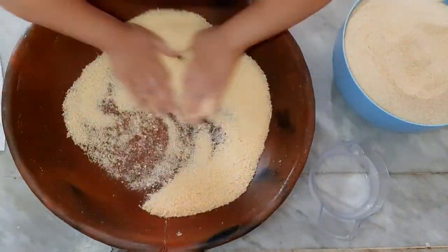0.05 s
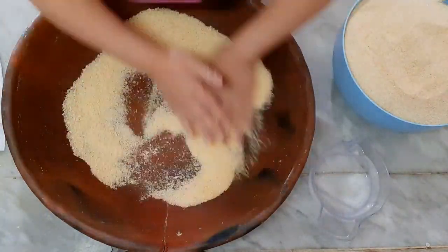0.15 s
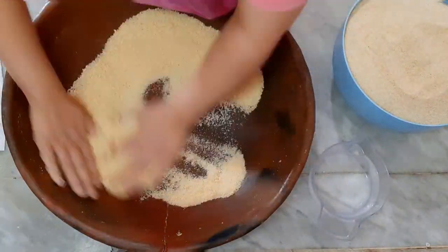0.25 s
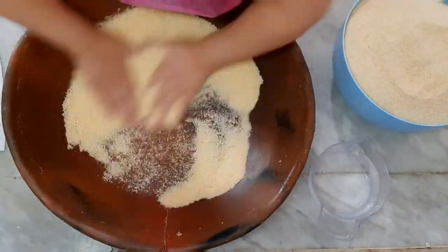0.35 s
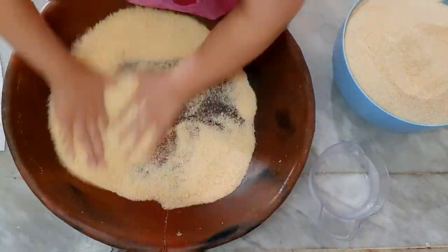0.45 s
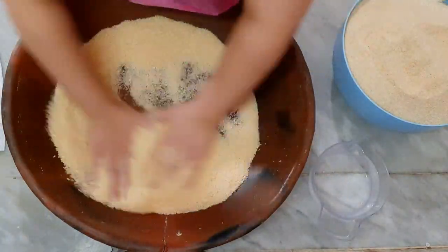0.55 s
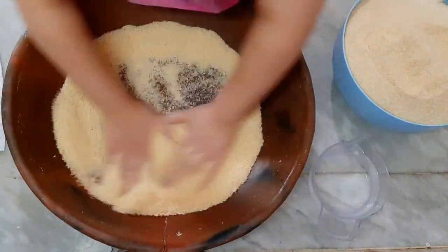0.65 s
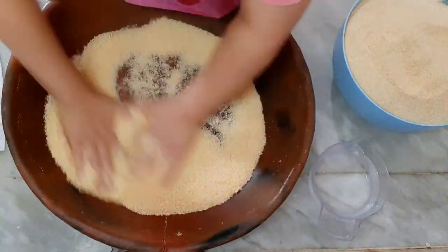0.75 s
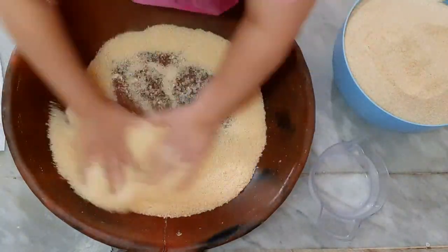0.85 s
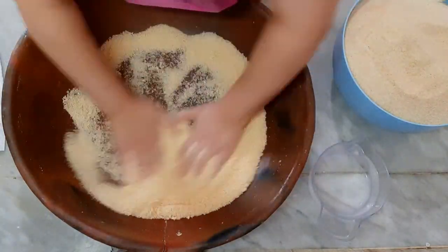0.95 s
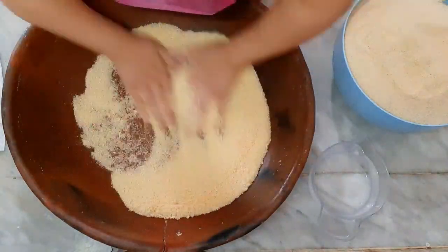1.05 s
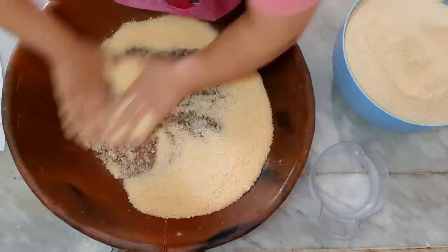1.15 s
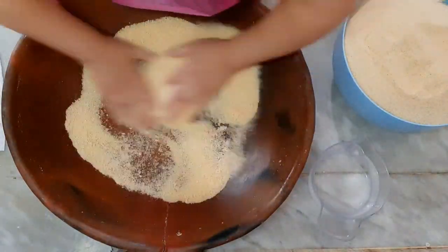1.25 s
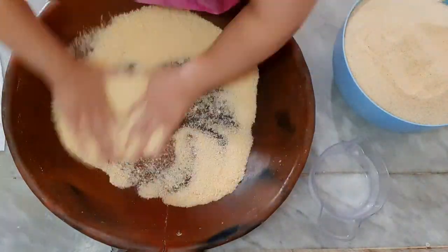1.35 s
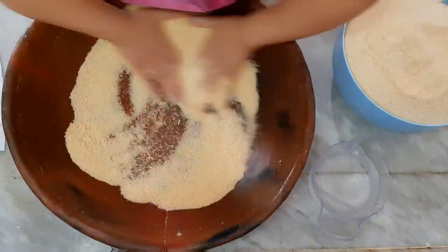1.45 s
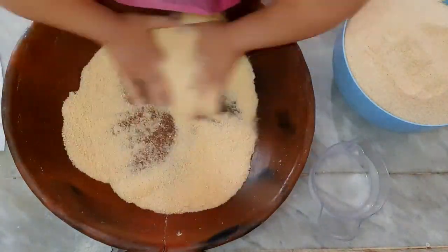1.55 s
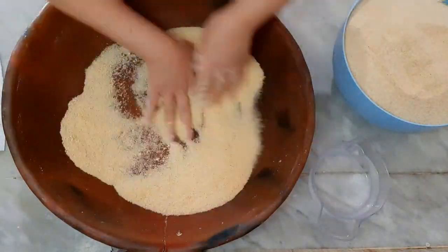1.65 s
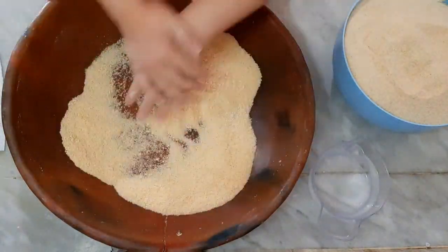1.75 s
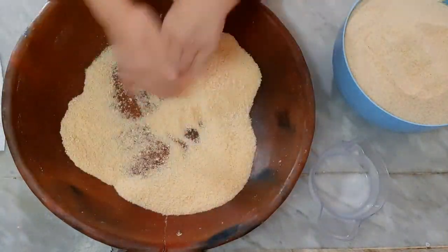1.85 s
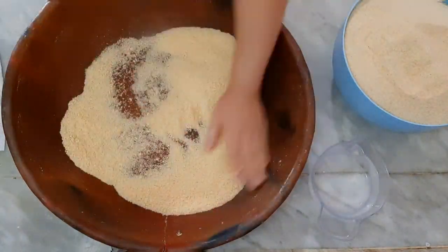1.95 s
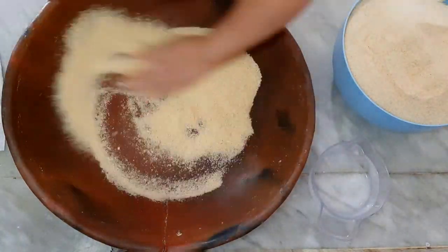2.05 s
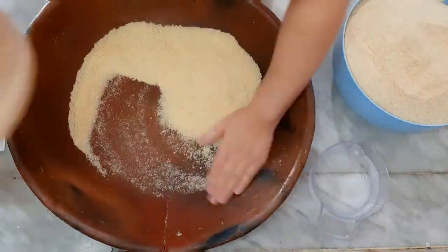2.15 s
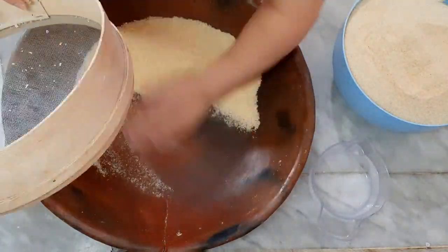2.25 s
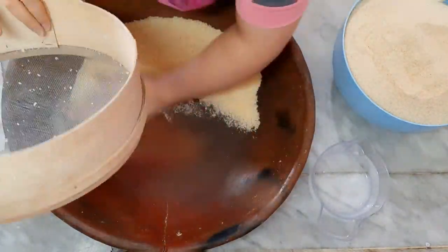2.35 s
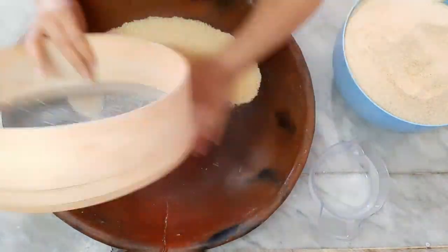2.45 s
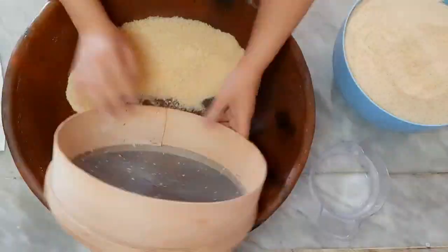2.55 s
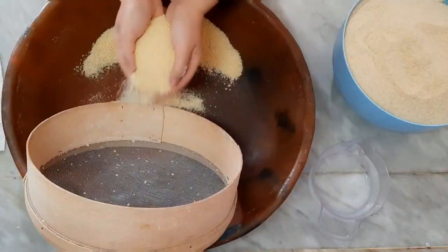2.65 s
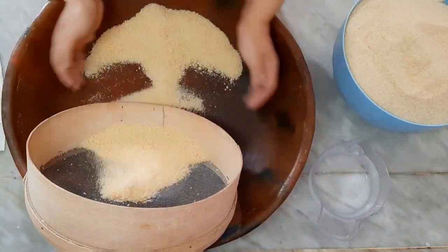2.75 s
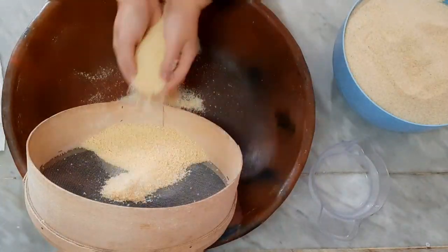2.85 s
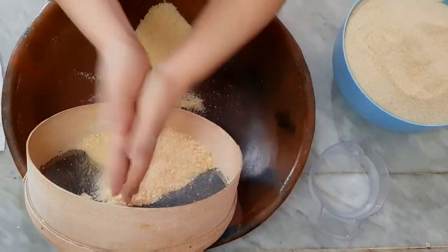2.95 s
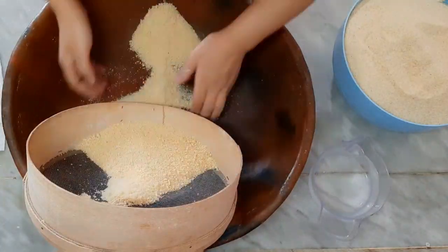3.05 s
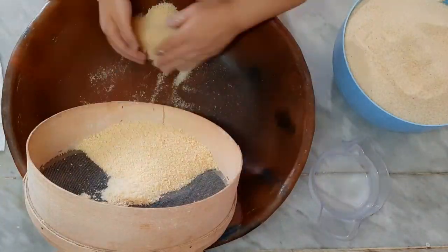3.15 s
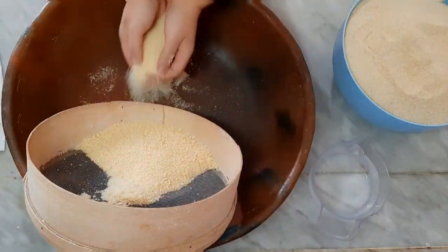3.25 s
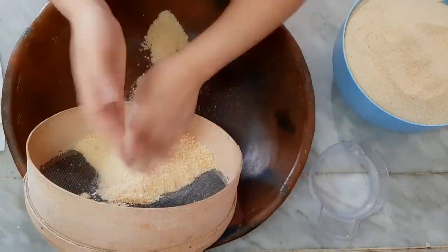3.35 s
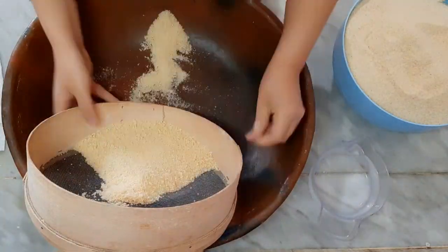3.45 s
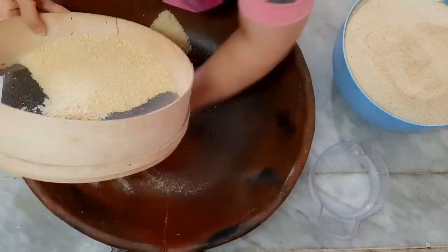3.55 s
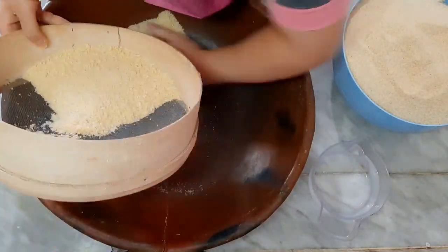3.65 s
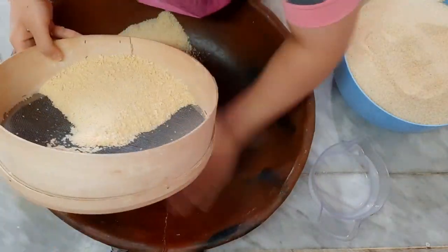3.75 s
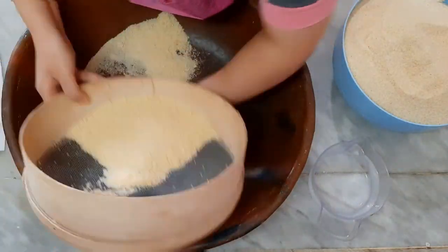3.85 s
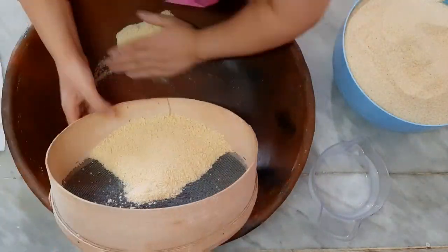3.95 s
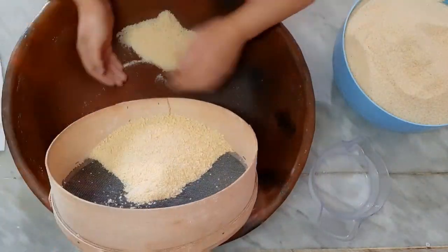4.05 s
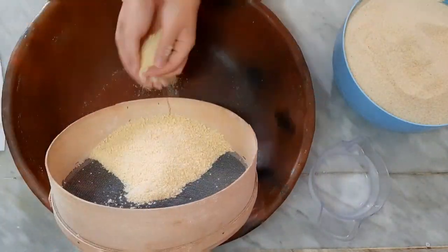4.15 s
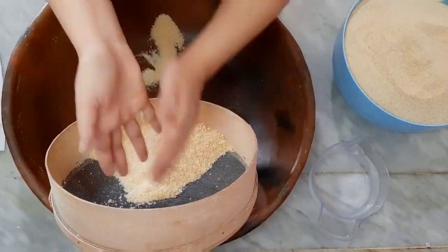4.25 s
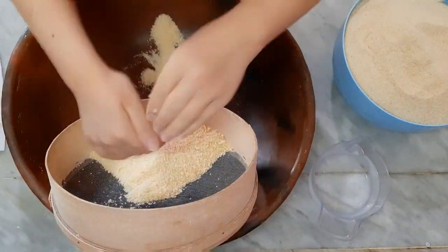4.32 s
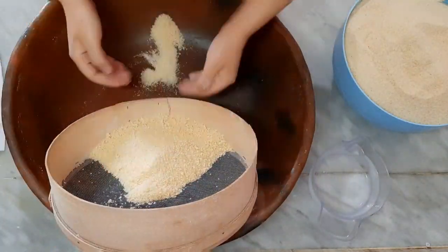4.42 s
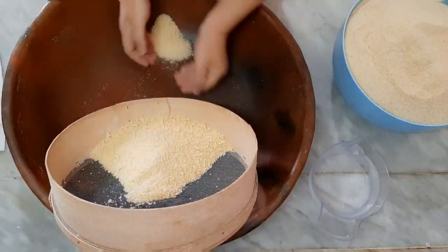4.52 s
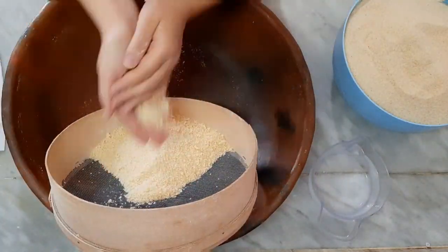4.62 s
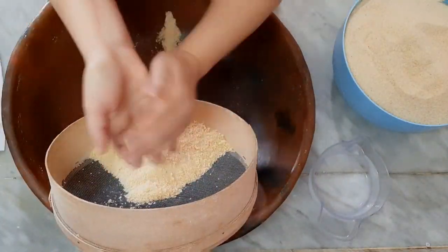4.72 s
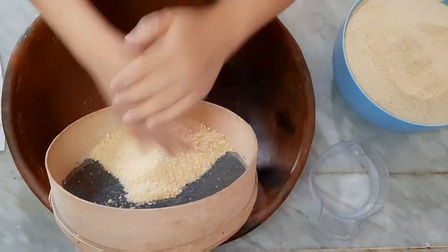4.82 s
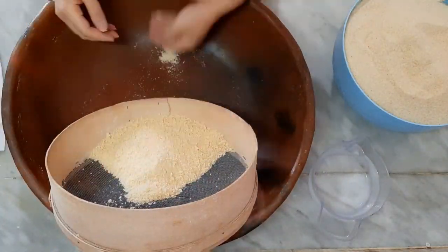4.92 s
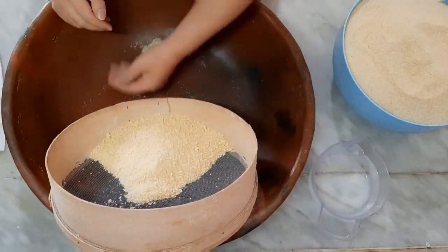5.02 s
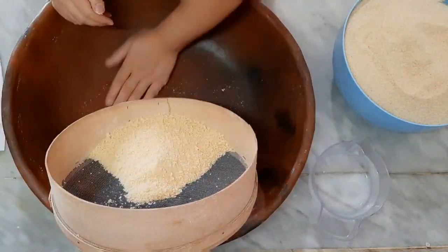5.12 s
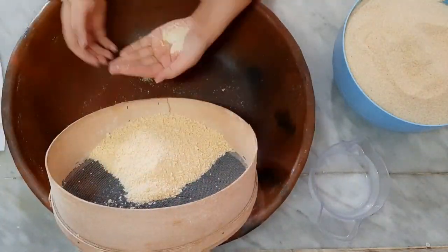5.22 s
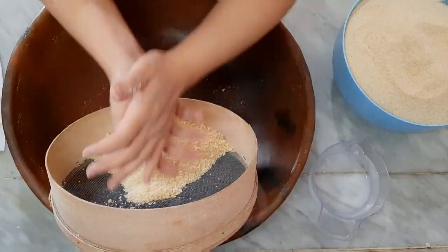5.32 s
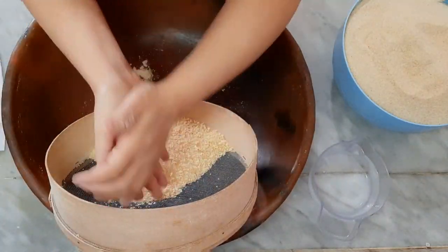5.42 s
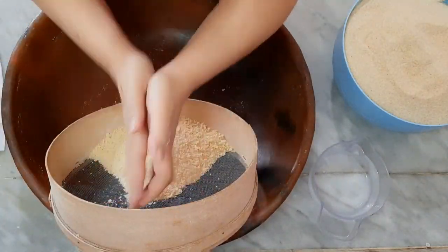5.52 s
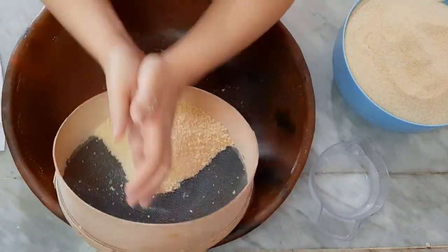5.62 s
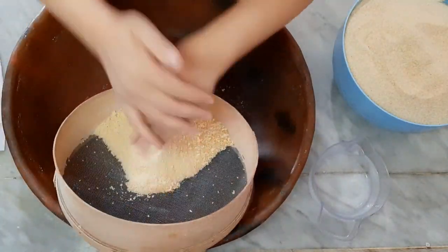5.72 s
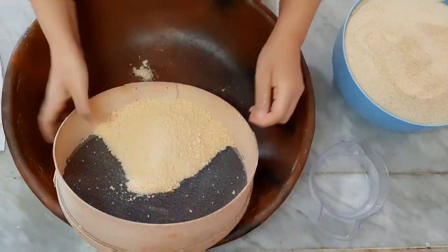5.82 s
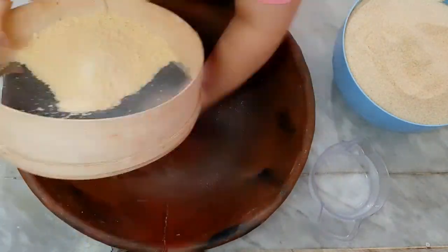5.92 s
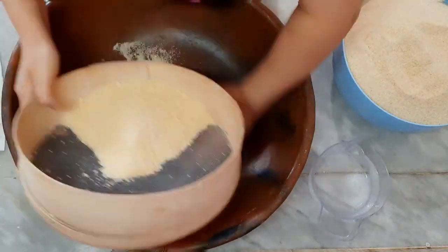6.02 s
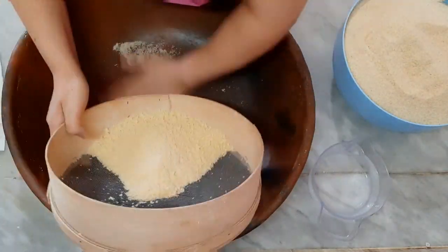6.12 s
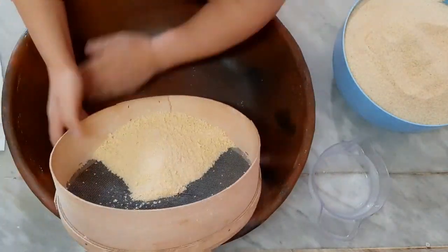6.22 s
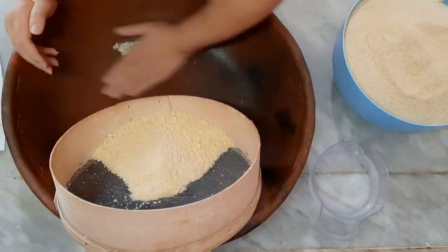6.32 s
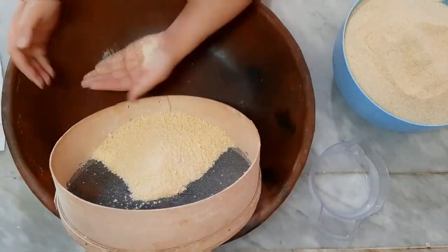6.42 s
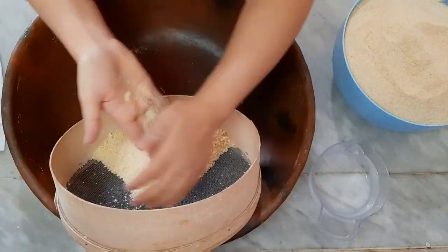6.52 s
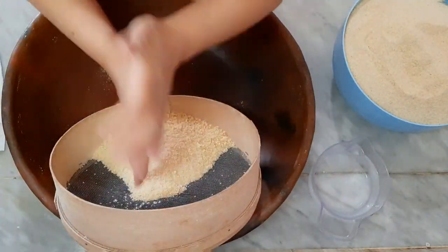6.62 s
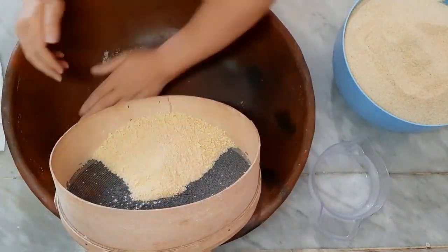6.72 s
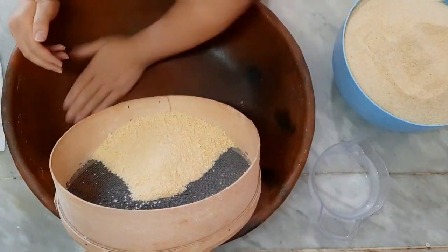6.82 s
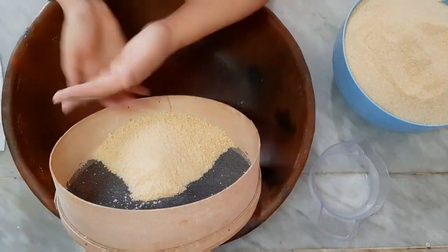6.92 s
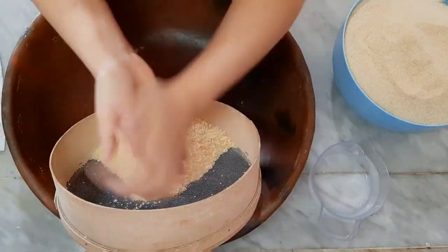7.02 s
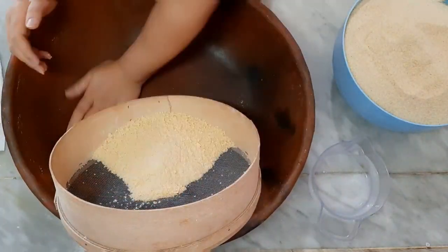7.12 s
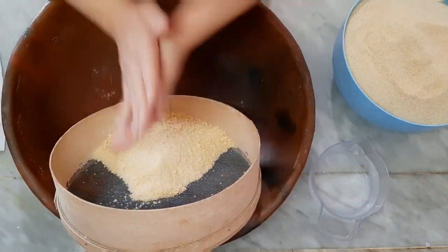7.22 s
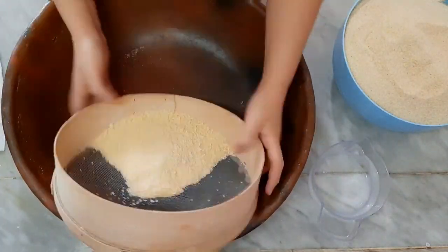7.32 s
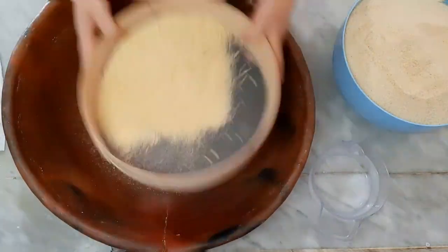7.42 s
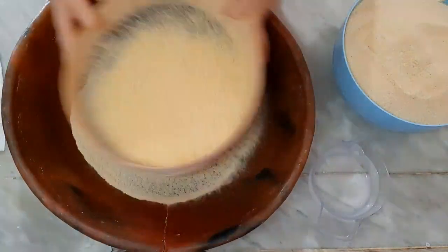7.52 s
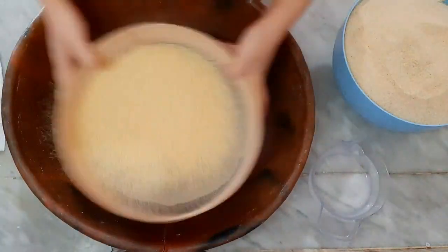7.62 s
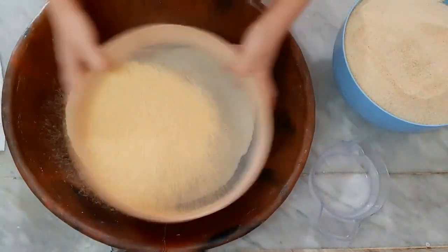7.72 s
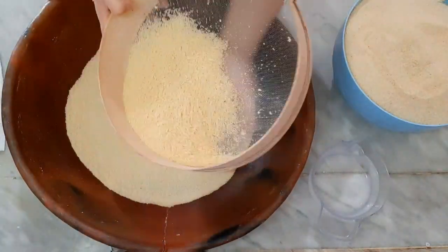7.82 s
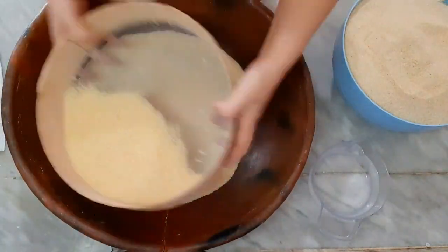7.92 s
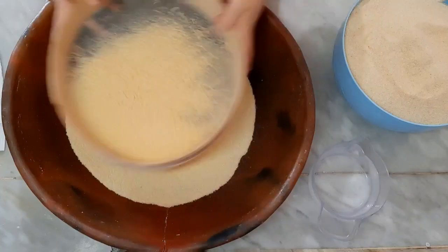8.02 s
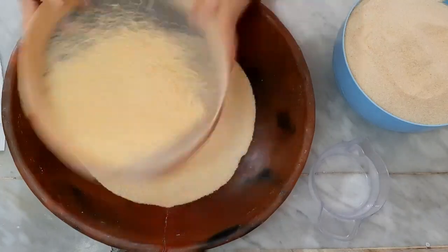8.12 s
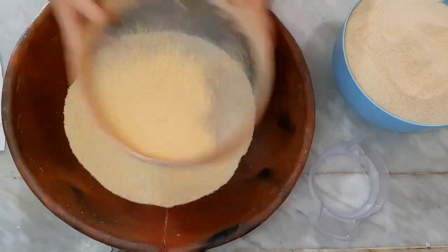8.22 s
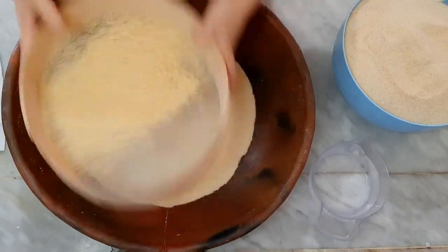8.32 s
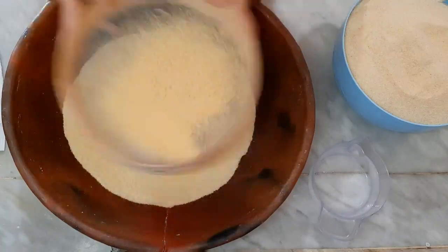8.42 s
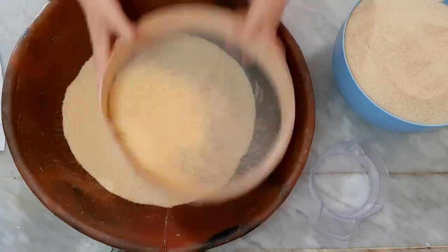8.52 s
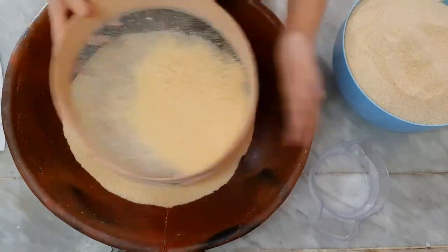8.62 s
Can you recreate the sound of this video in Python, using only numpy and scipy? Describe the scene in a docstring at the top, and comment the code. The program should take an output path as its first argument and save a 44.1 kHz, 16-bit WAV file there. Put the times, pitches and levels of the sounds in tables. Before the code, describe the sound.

Sped-up, chopped kitchen handling: gritty grain swishes, hollow bowl taps, a sharp clap, wooden thuds, finally a fast run of sifting hisses.

```python
"""A kitchen hums while hands sweep and scoop semolina in a wide clay bowl, sounding sped-up and chopped.
Shaped noise makes the sliding grain and the short bursts of hiss; bowl and sieve knock as notes and ringing noise.
Early on a bit of metal clinks as a few tones; then hands clap now and then, as noise cracks with short tails.
Near the end a wooden sieve is shaken in a quick run of hisses, and two last bursts follow.
Two unlike microphone ports listen throughout."""
import sys
import numpy as np
from scipy import signal
from scipy.fft import rfft, irfft, next_fast_len
from scipy.io import wavfile
from scipy.ndimage import uniform_filter1d, map_coordinates

SR = 44100
rng = np.random.default_rng(int(sys.argv[2]) if len(sys.argv) > 2 else 0)


def linear_from_db(decibels):
    """Turn decibels (scalar or array-like) into linear amplitude factors; 0 gives 1."""
    return 10 ** (np.asarray(decibels, float) / 20)


def bounce(signal):
    """Save signal as a 16-bit WAV file at the path given by the first command-line argument."""
    frames = np.transpose(np.atleast_2d(signal))
    limited = np.clip(frames, -1, 1)
    pcm = np.round(limited * 32767).astype(np.int16)
    wavfile.write(sys.argv[1], SR, pcm)


N = 382347  # length in samples

HARD_S = 0.021  # bursts shorter than this start more abruptly
# share of a burst's length that comes before its peak (less for the shortest bursts)
STROKE_RISE, KNOCK_RISE, TAP_RISE, NOTE_RISE = 0.44, 0.36, 0.25, 0.3
SIEVE_UP_S = 7.42  # the sieve is lifted off the bowl


def unit(x):
    """Scaled to rms 1."""
    return x / np.sqrt(np.mean(x ** 2) + 1e-20)


def along(points, hz):
    """Each column after Hz, read on a log frequency axis."""
    f, *cols = np.transpose(points)
    return np.squeeze([np.interp(np.log(hz + 1), np.log(f + 1), c) for c in cols])


def filtered(x, response):
    """The sound x with each frequency multiplied by the response."""
    m = next_fast_len(x.shape[-1] + 8192)
    gain = response(np.fft.rfftfreq(m, 1 / SR))
    return irfft(rfft(x, m) * gain, m)[..., :x.shape[-1]]


def spectrum(points):
    """Gain that follows a table of Hz and dB."""
    return lambda hz: linear_from_db(along(points, hz))


def resonant(modes):
    """Gain of resonances with steep skirts, added as powers."""
    def gain(f):
        power = 0
        for centre, width, db in modes:
            skirt = (f * width) ** 2
            power = power + (linear_from_db(db) * skirt / ((centre * centre - f * f) ** 2 + skirt)) ** 2
        return np.sqrt(power)
    return gain


# How alike left and right are. Each row: frequency in Hz, likeness (0 unrelated, 1 identical).
LIKENESS = [(60, 0.97), (250, 0.83), (500, 0.76), (900, 0.14), (2000, 0.063), (6100, 0.032), (6500, 0.77),
            (7400, 0.51), (7800, .05), (12800, .1), (13900, 0.73)]


def pair(excite, colour, uneven=None):
    """Blends two unrelated sounds into a coloured stereo pair of rms 1; a small uneven steadies its strength."""
    def turn(hz):
        return np.arccos(np.clip(along(LIKENESS, hz), 0, 1)) / 2
    mid, side = filtered(excite, lambda hz: colour(hz) * [np.cos(turn(hz)), np.sin(turn(hz))])
    if uneven:
        # only the shared part is steadied, by dividing by its own envelope
        envelope = np.abs(signal.hilbert(unit(mid), next_fast_len(N))[:N])
        mid = unit(unit(mid) / (uneven + envelope)) * np.std(mid)
    return unit(np.array([mid + side, mid - side]))


def noise():
    """Two unrelated channels of white noise."""
    return rng.standard_normal((2, N))


def grains(spread_db, patchy_db):
    """Dense grain impacts: sizes jump about every half millisecond, and the colour varies in patches."""
    size = np.repeat(rng.standard_normal(N // 20 + 1), 20)[:N]
    z = signal.stft(noise() * linear_from_db(spread_db * size), nperseg=512)[2]
    patches = uniform_filter1d(rng.standard_normal(z.shape[1:]), size=4, axis=0)  # over frequency
    patches = uniform_filter1d(patches, size=6, axis=1)  # over time
    return signal.istft(z * linear_from_db(patchy_db * unit(patches)), nperseg=512)[1][:, :N]


def swell(s, length, rise_share, edge):
    """Start sample and shape of a burst, its peak 1/8 s in; length is its width at half height."""
    t = np.arange(-SR // 8, SR // 8) / SR
    rise = np.clip(rise_share * min(1, length / HARD_S), 0.05, 0.95)
    u = np.where(t < 0, -t / rise, t / (1 - rise)) / max(length, 0.002)
    return round(s * SR), 2.0 ** -(u ** edge)


def bursts(rows, db, rise_share, edge):
    """Power over time of bursts (peak s, length s) at the given levels."""
    power = np.zeros(N + SR)
    for (s, length), level in zip(rows, db):
        at, shape = swell(s, length, rise_share, edge)
        power[at:at + len(shape)] += (linear_from_db(level) * shape) ** 2
    return power[SR // 8:][:N]


def ringing(hits, db, modes, rise):
    """A rattle of contacts: steadied noise rings through resonances in short bursts."""
    ring = pair(noise(), resonant(modes), uneven=0.091)
    return np.sqrt(bursts(hits[:, :2], db, rise, edge=1.35)) * ring


def tones(rows, rise):
    """Short sine notes, each starting anywhere in its cycle."""
    note = np.zeros(N + SR)
    for s, length, hz, db in rows:
        at, shape = swell(s, length, rise, edge=1.73)
        cycles = hz * np.arange(len(shape)) / SR + rng.random()
        note[at:at + len(shape)] += np.sqrt(2) * linear_from_db(db) * shape * np.sin(2 * np.pi * cycles)
    return note[SR // 8:][:N]


# Wavering hum tones. Each row: frequency in Hz, width in Hz (where it is 6 dB down), level in dB.
HUM_TONES = [(53.1, 8.8, -59), (113.7, 14, -69), (164, 9.3, -66), (227.8, 16, -71.5)]
# Low rumble, then airy whine. Each row: frequency in Hz, width in Hz (6 dB down), relative level in dB.
RUMBLE_MODES = [(38, 10, -2), (90, 60, 1.5), (215, 210, -5.5), (296, 124, -9.5)]
AIR_MODES = [(560, 140, 11), (1500, 300, -18), (2650, 170, 2), (5050, 400, 0)]


def kitchen():
    """A machine hum of a few wavering tones (narrow noise) over a rumble, and a faint airy whine."""
    sound = linear_from_db(-61.5) * pair(noise(), resonant(RUMBLE_MODES))
    sound = sound + linear_from_db(-72.0) * pair(noise(), resonant(AIR_MODES))
    for hz, width, db in HUM_TONES:
        sound = sound + linear_from_db(db) * pair(noise(), resonant([(hz, width, 0)]), uneven=0.94)
    return sound


def lifted():
    """How far the sieve is off the bowl, 0 to 1, over a tenth of a second."""
    return np.clip((np.arange(N) / SR - SIEVE_UP_S) / 0.1, 0, 1)


# Brief dips in the sliding hiss. Each row: deepest point in seconds, length in seconds, depth in dB.
DIPS = [(0.223, 0.045, 10.5), (1.7, 0.027, 14), (2.111, 0.012, 15), (2.242, .025, 8), (7.913, 0.025, 13.5),
        (7.966, 0.038, 8), (8.601, .023, 7.5)]


def unsteadiness():
    """Level changes in dB of moving grain: a flicker until the sieve is lifted, and a few brief dips."""
    dips_db = np.zeros(N + SR)
    for s, length, depth_db in DIPS:
        at, shape = swell(s, length, 0.59, edge=2.3)
        dips_db[at:at + len(shape)] -= depth_db * shape
    # 12 random points a second, joined smoothly
    flicker = map_coordinates(rng.standard_normal(400), [np.arange(N) / SR * 12])
    return 2.5 * (1 - lifted()) * flicker + dips_db[SR // 8:][:N]


# Sliding grain. Each row: time in seconds, hiss in dB, bowl hum in dB (before unsteadiness).
SLIDE = [(0, -62, -62), (.34, -61, -57.5), (.82, -54, -48.5), (1.25, -58.5, -57.5), (1.6, -56, -52),
         (1.8, -71, -78), (1.98, -56.5, -60), (2.18, -62, -64), (2.36, -65, -75), (2.68, -79, -75),
         (2.76, -56, -58), (2.92, -72, -81), (3.3, -69, -72), (3.43, -65, -67), (3.62, -75, -62),
         (3.9, -65, -61), (4.2, -73.5, -71), (5.3, -79, -74), (5.65, -66.5, -67), (5.89, -76.5, -74),
         (6.11, -59.5, -64), (6.35, -79.5, -68.5), (7.29, -74.5, -73), (7.39, -59, -66), (7.68, -56.5, -83),
         (8.04, -53, -78), (8.57, -48, -70), (8.67, -67, -59)]


def sliding(unsteady_db):
    """Power over time of the slide's hiss, hollow, sizzle and bowl hum; off the bowl it sounds thinner."""
    s, *columns = np.transpose(SLIDE)
    hiss, hum = (np.interp(np.arange(N) / SR, s, c) for c in columns)
    up = lifted()
    hollow = hiss - 0.2 - 4 * up
    sizzle = -67 + 0.56 * (hiss + 60) + 5.5 * up  # grows 0.56 dB per dB of hiss
    return linear_from_db(np.array([hiss, hollow, sizzle, hum]) + unsteady_db) ** 2


# Resonances of the clay wall. Each row: frequency in Hz, width in Hz (6 dB down), relative level in dB.
BOWL_MODES = [(420, 110, 0.5), (474, 67, 0.5), (546, 385, -8)]


def bowl_hum(power):
    """The clay wall sings under the dragged grain."""
    return np.sqrt(power) * pair(grains(spread_db=3.0, patchy_db=3.0), resonant(BOWL_MODES))


# Short bursts of hiss from hands moving through the grain.
# Each row: peak in seconds, length in seconds, hiss in dB, hollow in dB over the hiss.
STROKE_BURSTS = [(0.314, 0.028, -56, 3.5), (0.438, .075, -55.5, 3.5), (0.56, 0.016, -68, -7),
                 (0.65, 0.025, -64.5, 16), (0.693, 0.045, -49.5, 0), (0.809, .016, -51, 2),
                 (0.863, 0.027, -50, 2), (0.908, .049, -58.5, 23.5), (1.016, 0.039, -49, -3),
                 (1.125, 0.01, -55.5, 0), (1.199, 0.037, -47.5, -3.5), (1.28, 0.019, -57.5, -2),
                 (1.313, .024, -68, 16), (1.42, 0.034, -57, 3.5), (1.779, 0.03, -52.5, -3),
                 (1.841, 0.024, -40, -26), (1.878, 0.025, -50, -25), (1.929, .027, -56, 3),
                 (2.008, 0.065, -58, 3), (2.143, 0.028, -54, 2), (2.215, 0.027, -55.5, 4.5),
                 (2.283, 0.02, -46, 5), (2.334, 0.023, -44, 2), (2.376, 0.022, -51.5, 0.5),
                 (2.438, .036, -54, 3), (2.494, 0.026, -53.5, 1), (2.555, 0.023, -52.5, 4),
                 (2.58, 0.03, -46.5, -5), (2.641, 0.058, -52.5, -1), (2.722, 0.017, -48.5, -10),
                 (2.742, 0.029, -39.5, -3.5), (2.778, 0.02, -48.5, 6), (2.827, 0.035, -58.5, 4.5),
                 (2.955, 0.089, -56.5, -6), (3.1, 0.03, -49, 1), (3.136, 0.059, -52.5, 1.5),
                 (3.168, 0.016, -49, -1), (3.234, 0.031, -51, 1), (3.359, 0.023, -58.5, 6),
                 (3.42, 0.036, -69, 4), (3.451, 0.013, -51, -6), (3.585, 0.04, -55, 8.5),
                 (3.68, 0.044, -47, 0.5), (3.754, 0.029, -44, -2), (3.812, 0.027, -43.5, -1),
                 (3.869, 0.025, -47.5, 2.5), (3.931, 0.024, -53, -6), (3.986, 0.027, -51, 7),
                 (4.049, 0.019, -58, 5.5), (4.12, .033, -59.5, 3), (4.23, 0.079, -65, -5),
                 (4.361, 0.038, -59.5, -27), (4.397, 0.026, -56.5, -8), (4.49, 0.044, -52.5, 0),
                 (4.554, 0.035, -59, -7), (4.727, 0.03, -61, -17), (4.822, 0.028, -62, -24),
                 (4.765, 0.025, -65, -14), (4.865, .027, -64.5, -13), (4.96, 0.039, -66, 5),
                 (5.015, 0.021, -65, -5), (5.059, 0.02, -59.5, -7), (5.144, 0.06, -54.5, 2.5),
                 (5.266, 0.093, -69.5, 9.5), (5.427, 0.018, -65.5, -15), (5.504, 0.01, -62.5, -1),
                 (5.562, .018, -63, -11), (5.632, 0.042, -50, -24), (5.704, 0.033, -68, 6),
                 (5.763, .012, -61, -15), (5.797, .019, -53, 0), (5.876, 0.026, -64, -11),
                 (5.945, 0.036, -49, 2.5), (6.02, 0.027, -46, 2.5), (6.095, 0.021, -44, 3),
                 (6.141, 0.018, -45, -25), (6.167, 0.018, -51, 2), (6.22, 0.037, -45.5, 5.5),
                 (6.278, 0.028, -54, -2), (6.351, 0.059, -52, 3), (6.364, 0.024, -57, 7),
                 (6.511, 0.039, -64.5, -1), (6.6, 0.029, -53, 6.5), (6.649, 0.042, -61, -19),
                 (6.775, 0.021, -61, 4.5), (6.846, 0.037, -57.5, 4.5), (6.995, .022, -67.5, 4),
                 (7.157, 0.042, -58.5, 8), (7.246, .048, -57, 0), (7.349, 0.022, -52.5, 1),
                 (7.376, 0.011, -52, -11), (8.624, .022, -42, -1.5), (8.666, 0.025, -37.5, -5.5)]
# Shakes of the sieve. Each row: peak in seconds, hiss in dB.
SHAKES = [(7.411, -56), (7.467, -57.5), (7.512, -47.5), (7.557, -57), (7.604, -50.5), (7.663, -45.5),
          (7.717, -47), (7.775, -49), (7.829, -53.5), (7.947, -54), (8.017, -46.5), (8.091, -53.5),
          (8.138, -51.5), (8.199, -44), (8.253, -46), (8.302, -46.5), (8.451, -44), (8.499, -45),
          (8.549, -44)]
# Sizzle: dull in the deep heap, brighter on bare clay.
# Each row: time in seconds, sizzle in dB over a -50 dB hiss (before scatter).
BURST_SIZZLE = [(0, 4), (.6, -14), (1.85, -9), (2.1, -2), (2.7, -8), (3.1, -5), (4.1, -5), (4.5, -7),
                (5.7, -9), (5.95, -4.5), (6.55, -7.5), (6.8, -2), (7.2, -8.5), (7.6, -3.5), (8.67, -8)]


def stroke_bursts():
    """Power over time of hiss, hollow and sizzle in the bursts and shakes; stronger ones sizzle relatively less."""
    shakes = [(s, 0.026, db, -5) for s, db in SHAKES]  # 26 ms long, hollow 5 dB under the hiss
    rows = np.array(list(STROKE_BURSTS) + shakes)
    s, _, hiss_db, hollow_db = rows.T
    sizzle_db = np.interp(s, *np.transpose(BURST_SIZZLE))
    sizzle_db = sizzle_db - 0.23 * (hiss_db + 50)
    sizzle_db = sizzle_db + rng.standard_normal(len(s))  # scatter of 1 dB from burst to burst
    levels = hiss_db, hiss_db + hollow_db, hiss_db + sizzle_db
    return [bursts(rows[:, :2], db, STROKE_RISE, edge=2.49) for db in levels]


# Colours of hiss and of sizzle. Each row: frequency in Hz, relative level in dB per Hz.
HISS_COLOUR = [(1200, -7.5), (1900, -4.5), (2400, -0.5), (3200, -0.5), (4200, -1.5), (5100, -2), (6000, -7),
               (8000, -13), (10000, -14.5), (12000, -39.5)]
SIZZLE_COLOUR = [(6000, 1), (8500, 2.5), (11000, 2), (12400, -2.5), (14000, 4.5), (15700, -15.5)]
# The hollow of cupped hands. Each row: frequency in Hz, width in Hz (6 dB down), relative level in dB.
HOLLOW_MODES = [(720, 390, 0), (1110, 900, 5), (1485, 670, 10.5), (2020, 1060, -4)]


def grain(unsteady_db):
    """Bursts and shakes add their power to the slide; hiss, hollow and sizzle are each one shared noise."""
    *slide, hum = sliding(unsteady_db)
    sound = bowl_hum(hum)
    colours = spectrum(HISS_COLOUR), resonant(HOLLOW_MODES), spectrum(SIZZLE_COLOUR)
    for steady, burst, colour in zip(slide, stroke_bursts(), colours):
        sound += np.sqrt(steady + burst) * pair(grains(spread_db=1.5, patchy_db=2.5), colour)
    return sound


# Taps on the bowl. Each row: peak in seconds, length in seconds, level in dB.
TAPS = [(0.439, .027, -47.5), (0.533, .013, -49), (0.65, 0.067, -49), (.818, .033, -51),
        (0.901, 0.052, -44.5), (1.002, .017, -45.5), (1.08, .033, -49.5), (1.174, 0.043, -48.5),
        (1.313, 0.021, -48.5), (1.82, .013, -40.5), (2.334, .015, -52.5), (2.377, .013, -53.5),
        (2.551, 0.01, -40), (2.579, 0.012, -32), (2.628, 0.023, -39), (2.78, 0.022, -43.5),
        (3.092, .011, -48), (3.114, .023, -48), (3.128, 0.028, -40.5), (3.168, 0.018, -43.5),
        (3.443, 0.033, -56), (3.682, 0.017, -48.5), (3.758, .016, -44.5), (3.95, 0.0079, -29.5),
        (3.973, 0.035, -48), (5.004, 0.014, -51.5), (5.625, .037, -50.5), (5.801, .007, -49),
        (5.929, 0.03, -43.5), (6.089, 0.021, -43.5), (6.184, 0.022, -38.5), (6.216, 0.017, -42),
        (7.044, 0.0052, -42), (7.351, 0.019, -39.5), (8.627, .012, -51)]


def taps():
    """Short contacts ring the bowl wall."""
    rows = np.array(TAPS)
    return ringing(rows, rows[:, 2], BOWL_MODES, TAP_RISE)


# Low thuds of hands and sieve.
# Each row: peak in seconds, length in seconds, note in Hz, note level in dB, hoop in dB over the note.
KNOCKS = [(.446, .027, 156, -58, -1), (.652, 0.056, 135.7, -51.5, 1.5), (0.823, 0.038, 68, -56.5, 6.5),
          (1.005, .017, 70, -50, -6), (1.308, 0.024, 68.8, -49, 4), (1.821, 0.014, 97.5, -49.5, 12),
          (2.281, .019, 158.4, -55.5, -11), (2.379, 0.014, 74.5, -46, -26), (2.56, .012, 142.4, -46.5, 8),
          (2.583, 0.012, 151, -36, 1.5), (2.633, .03, 155.7, -35, -12), (2.775, 0.018, 183.3, -29.5, -4.5),
          (3.091, 0.009, 86.2, -31.5, -9.5), (3.111, 0.018, 103.2, -32, -5.5), (3.136, 0.029, 107, -35, -3),
          (3.166, 0.015, 167.8, -31, -6.5), (3.352, 0.013, 220, -50.5, 2), (3.415, .03, 213.4, -49, -3.5),
          (3.445, 0.037, 117.4, -43.5, 1), (3.764, 0.01, 123.4, -46.5, -1), (3.86, 0.035, 179.2, -48, -2.5),
          (3.951, 0.0091, 214.2, -35, -4), (3.982, 0.065, 153, -50.5, -2.5), (4.112, 0.03, 90.6, -52, -2),
          (4.41, 0.02, 219, -46.5, -6), (5.633, 0.035, 166.5, -40, -6), (5.799, 0.0062, 85, -56.5, 5),
          (6.185, 0.02, 143.7, -44, 0), (6.593, 0.02, 127.7, -47.5, 8.5), (7.043, .006, 176.6, -53.5, 14.5),
          (7.351, 0.019, 164, -29.5, -9.5), (7.375, 0.02, 137.7, -36, -9.5), (7.495, 0.015, 94.6, -42, -21),
          (7.62, 0.013, 117, -39.5, -22), (8.552, 0.015, 121.7, -39, -32), (8.615, 0.011, 213, -58, 11),
          (8.664, 0.025, 208, -50, 10)]
# Thump, then sieve hoop. Each row: frequency in Hz, width in Hz (6 dB down), relative level in dB.
THUMP_MODES = [(68.6, 115, -8), (132.5, 20, 3), (191, 28, -6.5)]
HOOP_MODES = [(278.4, 130, 2), (573, 93, -7.5), (918, 134, -13), (1105, 370, -21)]


def knocks():
    """Each knock is a low note of its own with a short rattling thump and the sieve hoop."""
    rows = np.array(KNOCKS)
    note_db = rows[:, 3]
    thump = ringing(rows, note_db - 4, THUMP_MODES, KNOCK_RISE)
    hoop = ringing(rows, note_db + rows[:, 4], HOOP_MODES, KNOCK_RISE)
    return tones(rows[:, :4], KNOCK_RISE) + thump + hoop


# Clear notes of the knocking: low thumps, bowl and wood.
# Each row: peak in seconds, length in seconds, frequency in Hz, level in dB.
CLEAR_NOTES = [(0.446, .015, 460, -50), (.54, 0.014, 470, -47), (1.307, 0.012, 800, -43),
               (2.58, 0.015, 440, -34.5), (2.773, 0.013, 872, -41.5), (2.775, 0.025, 571, -44.5),
               (2.776, .03, 61.9, -39), (2.822, 0.026, 90, -46.5), (3.112, .018, 530, -40.5),
               (3.118, 0.014, 1000, -45), (3.165, 0.018, 570, -42.5), (3.95, 0.0061, 415, -28),
               (4.405, 0.027, 266.7, -47), (5.53, 0.011, 1500, -60.5), (5.798, 0.0035, 1450, -45),
               (6.186, 0.013, 420, -43.5), (6.594, 0.023, 279.4, -44), (8.624, 0.013, 292, -54)]


def clear_notes():
    """Low thumps, bowl and wood sound as short clear sine notes, most of them together with a knock."""
    return tones(CLEAR_NOTES, NOTE_RISE)


# Palm and knuckles meeting bare clay or wood.
# Each row: peak in seconds, length in seconds, rasp in dB, knuckle in dB.
PALM_HITS = [(0.646, 0.025, -66, -37), (.872, .035, -51, -54), (0.908, 0.065, -43, -49),
             (1.19, 0.027, -48, -51), (1.308, 0.028, -66, -42.5), (2.563, 0.027, -70, -40),
             (2.775, 0.037, -52, -45), (3.11, 0.028, -53, -47), (5.138, .043, -60, -51.5),
             (6.332, .026, -49, -70)]
# Palm rasp, then knuckle. Each row: frequency in Hz, width in Hz (6 dB down), relative level in dB.
RASP_MODES = [(1000, 680, -11), (1390, 660, -3), (2200, 1200, -1), (3500, 600, -22)]
KNUCKLE_MODES = [(635, 280, -2), (810, 180, 0.5), (1030, 170, 1.5), (1260, 360, -7)]


def palms():
    """A palm rasps broadly; a knuckle gives a rounded knock."""
    rows = np.array(PALM_HITS)
    rasp = pair(grains(spread_db=3, patchy_db=1.5), resonant(RASP_MODES))
    knuckle = pair(noise(), resonant(KNUCKLE_MODES), uneven=0.4)
    rasp_power = bursts(rows[:, :2], rows[:, 2], KNOCK_RISE, edge=1.73)
    knuckle_power = bursts(rows[:, :2], rows[:, 3], KNOCK_RISE, edge=1.73)
    return np.sqrt(rasp_power) * rasp + np.sqrt(knuckle_power) * knuckle


# Metal clinks. Each row: peak in seconds, length in seconds, dB added to all its tones.
CLINKS = [(.685, 0.02, 9), (.977, 0.011, 11.5), (1.016, 0.018, 10)]
# Tones of the metal. Each row: frequency in Hz, then dB in each of the three clinks (before that addition).
CLINK_MODES = [(1070, -54, -75, -54), (2283, -55, -66, -62), (2770, -70, -75, -62), (3950, -54, -75, -49),
               (4366, -55, -59, -70), (5980, -54, -75, -56), (6420, -60, -65, -72), (7843, -62, -66, -72),
               (8500, -66, -75, -68), (9420, -68, -75, -66), (10885, -53, -72, -69), (11480, -69, -74, -67),
               (11870, -72, -67, -69), (12620, -74, -72, -69), (13700, -72, -66, -65),
               (14300, -72, -68, -70)]


def clinks():
    """A small metal thing touches the bowl: a few modes, briefly, blurred by the rattling contact."""
    sound, modes = np.zeros((2, N + SR)), np.array(CLINK_MODES)
    for k, (s, length, db) in enumerate(CLINKS):
        at, shape = swell(s, length, 0.5, edge=2.5)
        # the phase wanders at random, which blurs each tone
        drift = 0.06 * np.cumsum(rng.standard_normal((len(modes), len(shape))), axis=1)
        cycles = modes[:, :1] * np.arange(len(shape)) / SR + rng.random((2, len(modes), 1))
        level = linear_from_db(db + modes[:, k + 1, None])
        sound[:, at:at + len(shape)] += shape * (level * np.sin(2 * np.pi * cycles + drift)).sum(1)
    return sound[:, SR // 8:][:, :N]


# Hand claps. Each row: time in seconds, crack in dB, tail in dB, seconds for the tail to fall 60 dB.
CLAPS = [(1.820, -14, -29.5, 0.077), (5.801, -48, -57, 0.035), (6.587, -48, -61, 0.1),
         (7.043, -29.5, -47.5, 0.11)]
# Colour of a clap. Each row: frequency in Hz, relative level in dB per Hz.
CRACK_COLOUR = [(250, -13), (500, 4), (900, -24), (1500, 6), (2200, -5), (3200, -4), (4400, 3.5),
                (6000, -10.5), (9000, -7.5), (12400, -16), (13000, -26), (15700, -27)]


def claps():
    """A noise crack of a few milliseconds, one echo off the bowl and a short kitchen tail."""
    t, envelope = np.arange(N) / SR, 0
    for s, crack_db, tail_db, t60 in CLAPS:
        crack = np.exp(-((t - s) / 0.0016) ** 2)
        echo = linear_from_db(-17) * np.exp(-((t - s - 0.0062) / 0.0015) ** 2)  # 6.2 ms later
        tail = (t > s) * linear_from_db(tail_db - 60 * np.abs(t - s) / t60)
        envelope = envelope + linear_from_db(crack_db) * (crack + echo) + tail
    return envelope * pair(noise(), spectrum(CRACK_COLOUR), uneven=0.62)


# Grain running over the sieve mesh. Each row: time in seconds, level in dB (before unsteadiness).
SIFT = [(7.3, -68), (7.4, -62), (7.7, -54), (7.9, -57.5), (8.03, -50.5), (8.3, -47.5), (8.55, -48.5),
        (8.6, -62), (8.67, -44)]
# Colour of the mesh. Each row: frequency in Hz, width in Hz (6 dB down), relative level in dB.
MESH_MODES = [(1650, 370, 3.5), (2310, 600, 1.5), (3600, 1900, -5.5), (5050, 700, -2.5)]


def sifting(unsteady_db):
    """Grain runs over the sieve mesh, as noise coloured by the mesh."""
    level_db = np.interp(np.arange(N) / SR, *np.transpose(SIFT), left=-120)
    return linear_from_db(level_db + unsteady_db) * pair(grains(spread_db=2, patchy_db=0.6), resonant(MESH_MODES))


def scene():
    """All the sources together; slide and mesh share one unsteadiness."""
    unsteady_db = unsteadiness()
    sound = kitchen() + grain(unsteady_db) + taps() + knocks() + clear_notes()
    return sound + palms() + clinks() + claps() + sifting(unsteady_db)


# Colour of the two microphone ports. Each row: frequency in Hz, left gain in dB, right gain in dB.
PORTS = [(29.7, 4, -3), (54.6, 1, 1), (800, 1, 1), (1670, -1, -2.5), (2530, 2.5, -4), (5200, 1.5, -4),
         (5950, 0.5, -1), (7520, -6.5, -0.5), (8500, -36.5, -0.5), (9950, -25.5, -0.5), (10920, -20, 1.5),
         (12500, -9, 10.5), (13900, -5, -2), (15600, 2.5, 20), (16600, -4.5, -21), (17000, -57.5, -67)]


def ports(dry):
    """Each port has its own colour; the left one has a deep treble notch."""
    return filtered(dry, spectrum(PORTS))


def low_pass(x):
    """Removes everything above the highest recorded frequency."""
    return signal.sosfilt(signal.butter(12, 16890, fs=SR, output="sos"), x)


def record(dry):
    """The scene as the two ports hear it, finished."""
    mix = ports(dry)
    return low_pass(mix)


dry = scene()
out = record(dry)
bounce(out)
```